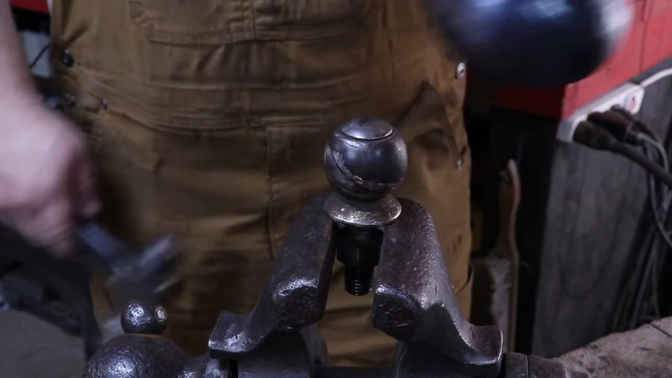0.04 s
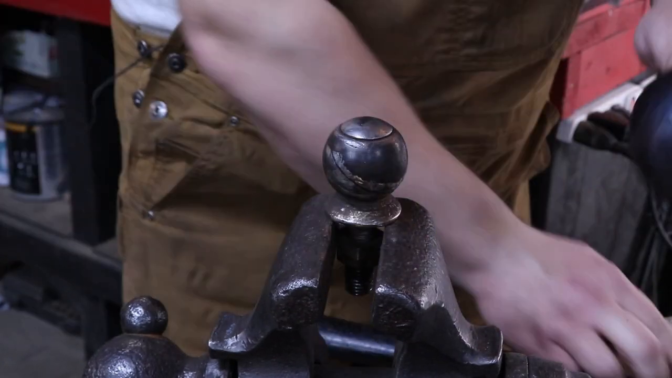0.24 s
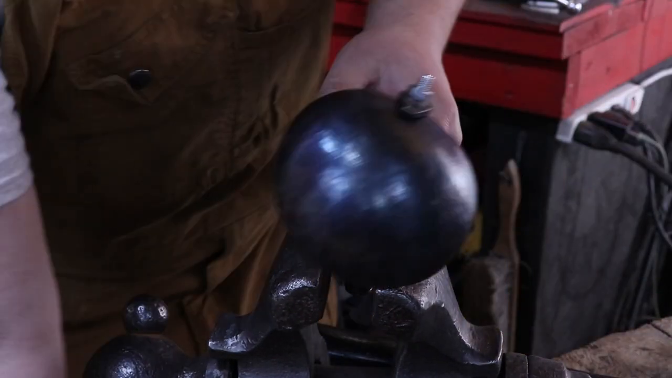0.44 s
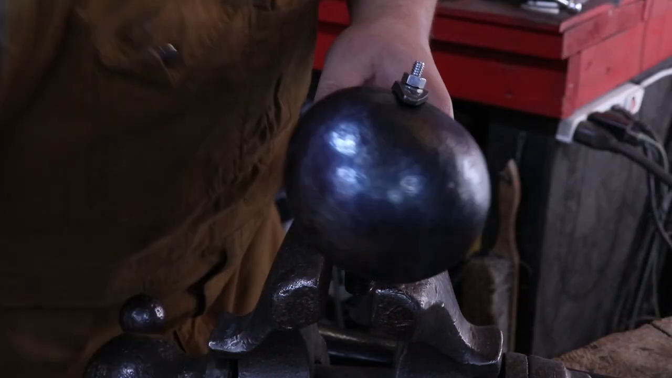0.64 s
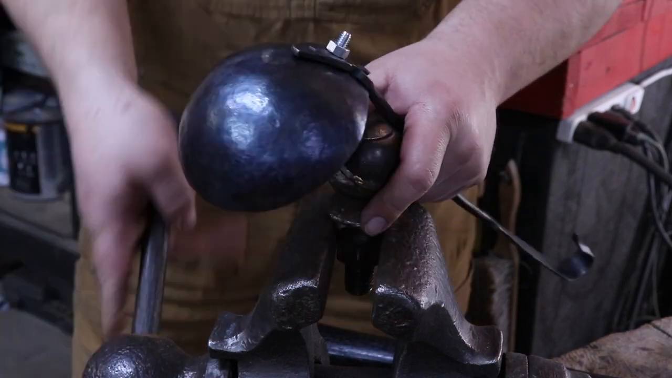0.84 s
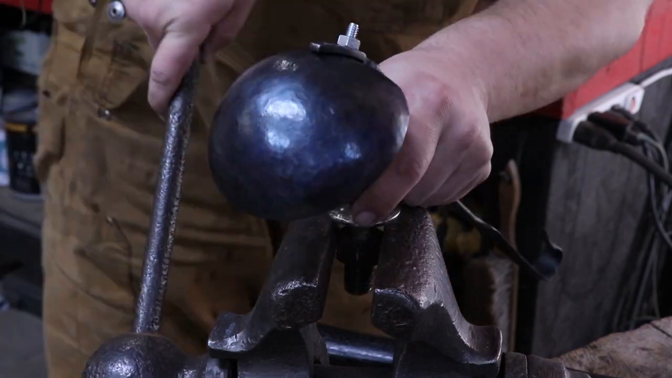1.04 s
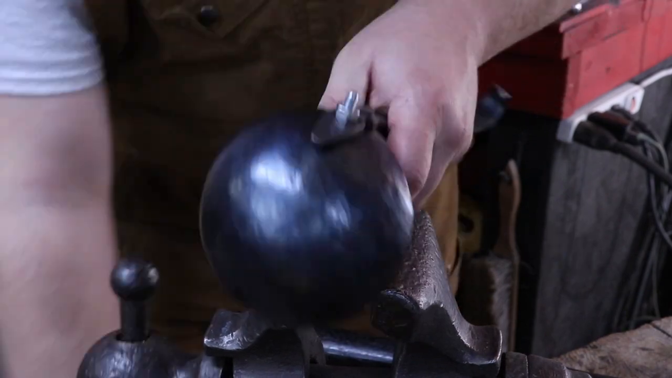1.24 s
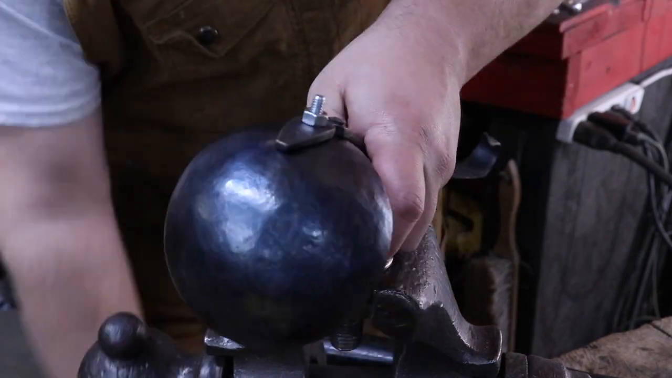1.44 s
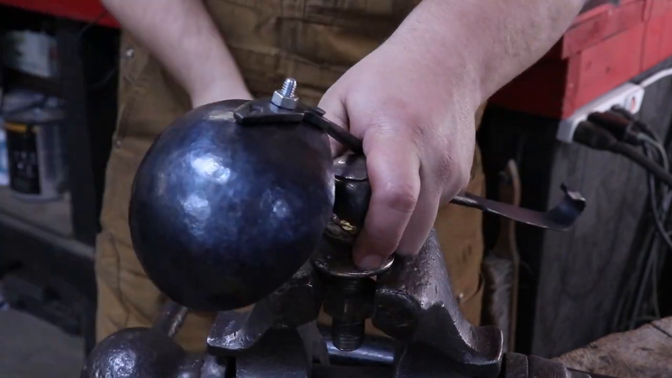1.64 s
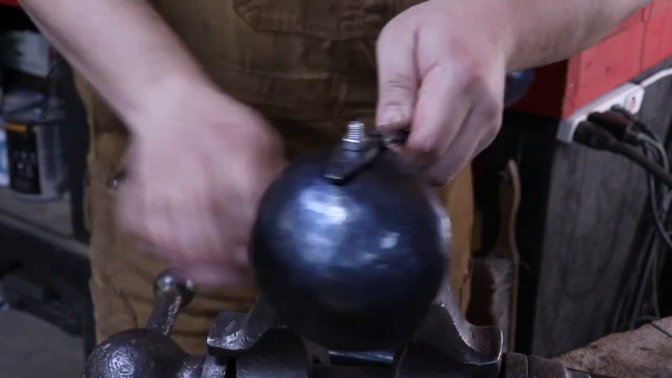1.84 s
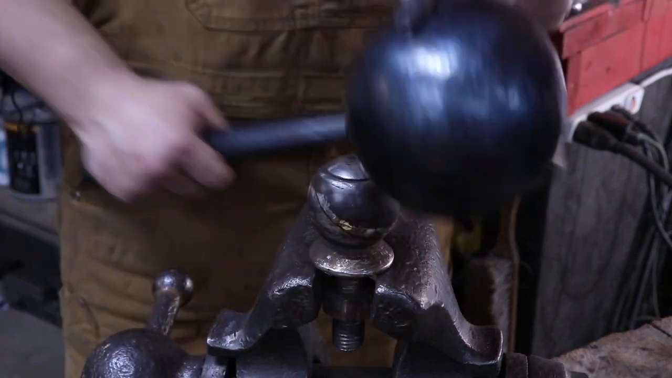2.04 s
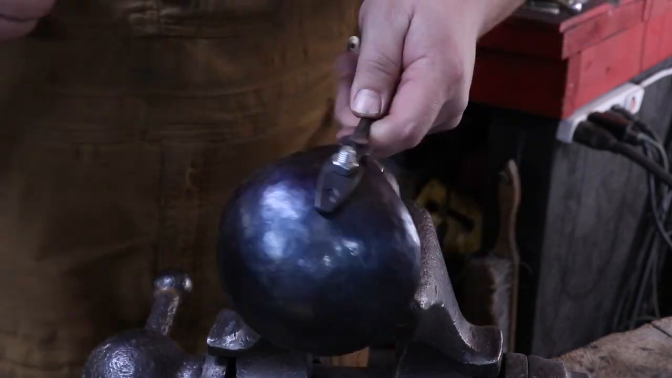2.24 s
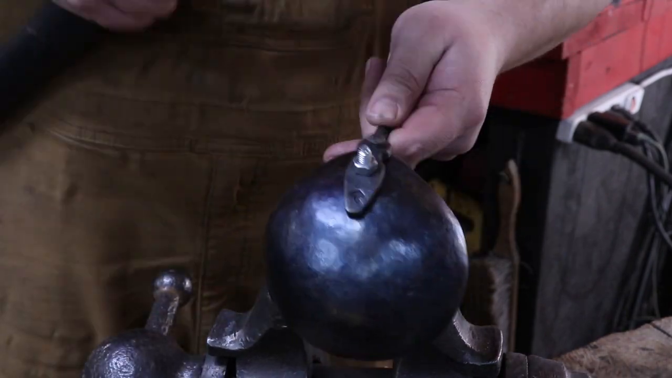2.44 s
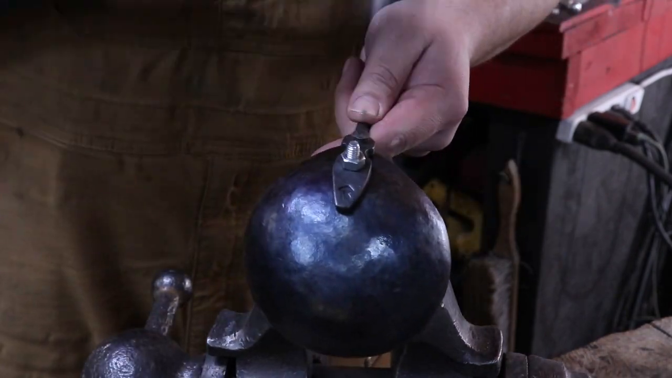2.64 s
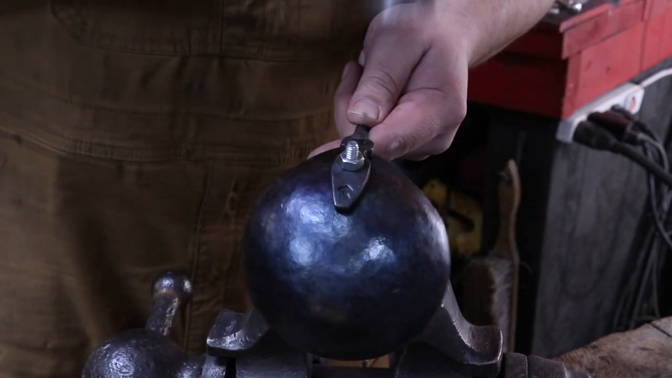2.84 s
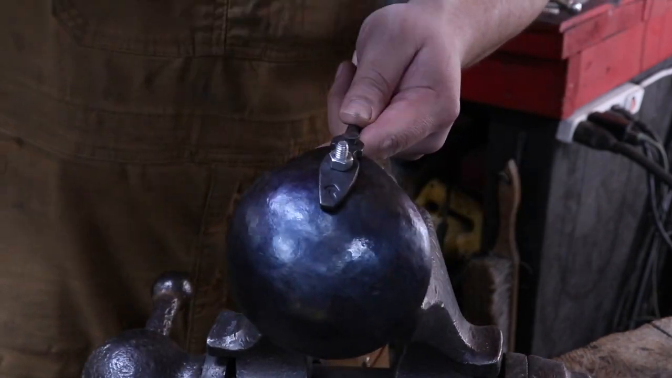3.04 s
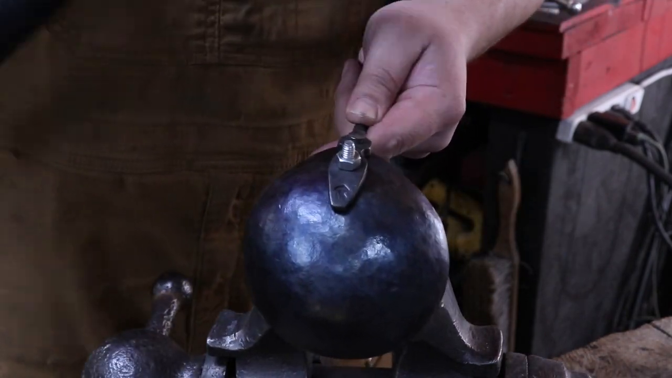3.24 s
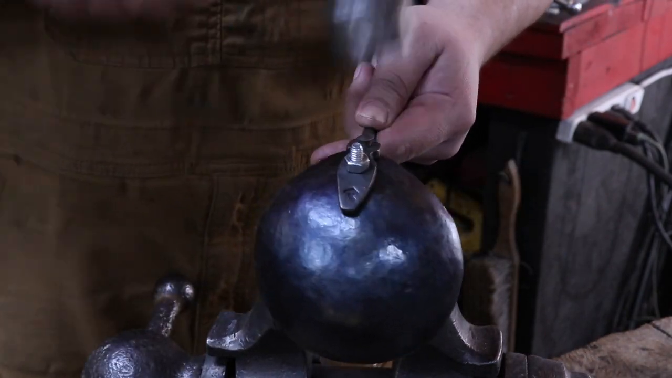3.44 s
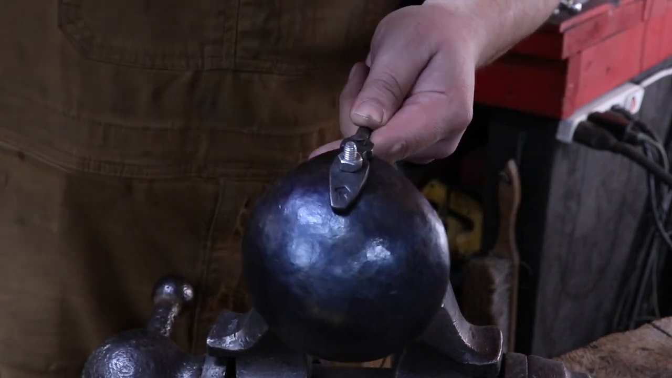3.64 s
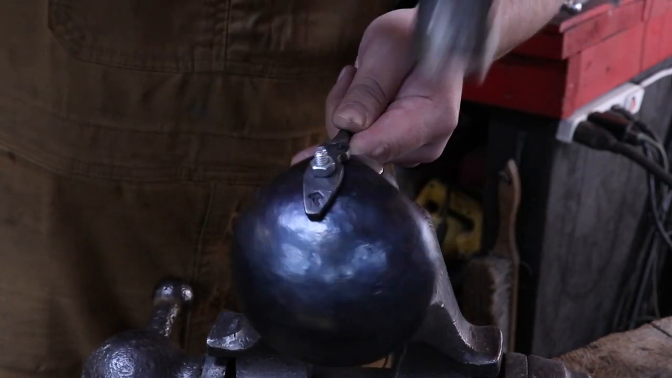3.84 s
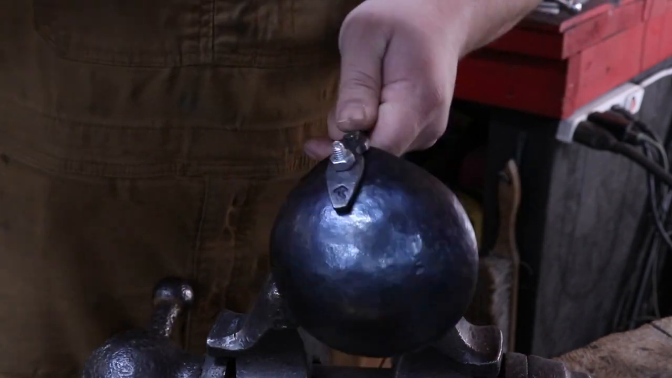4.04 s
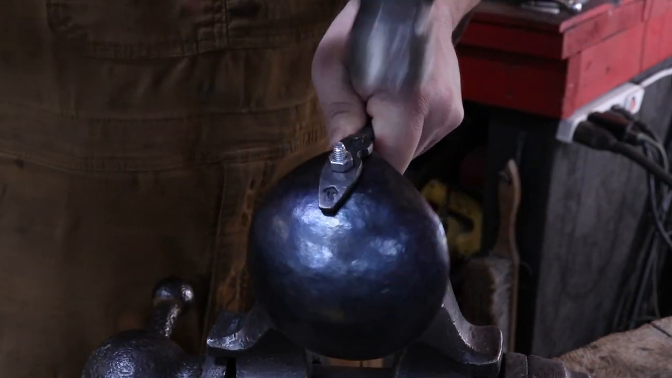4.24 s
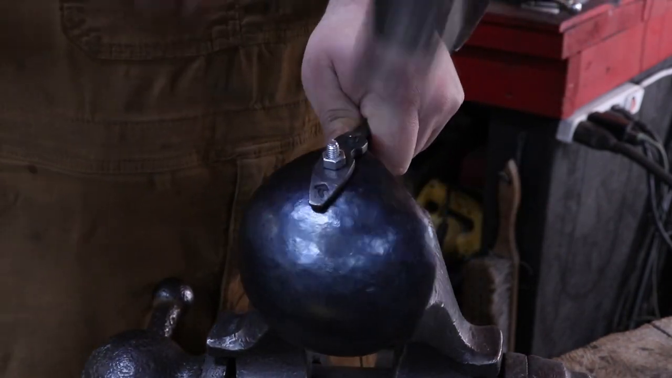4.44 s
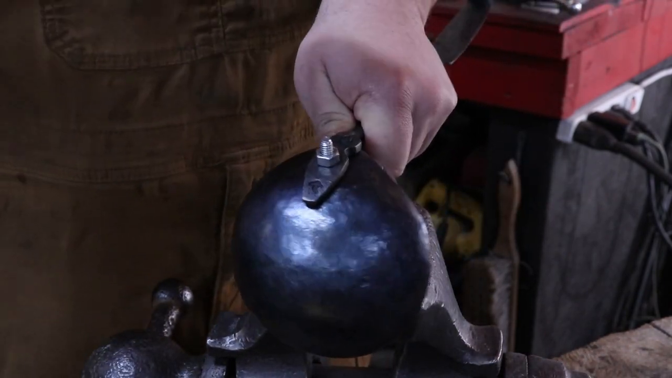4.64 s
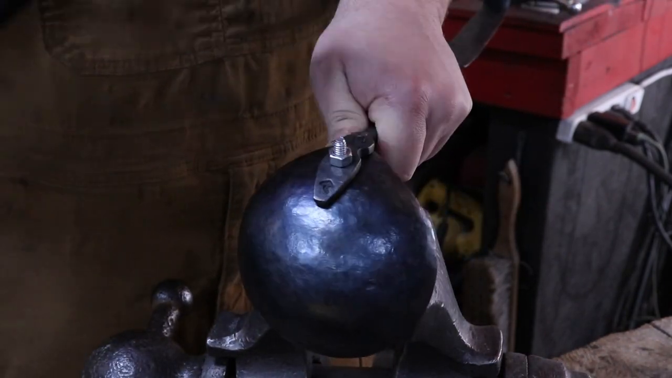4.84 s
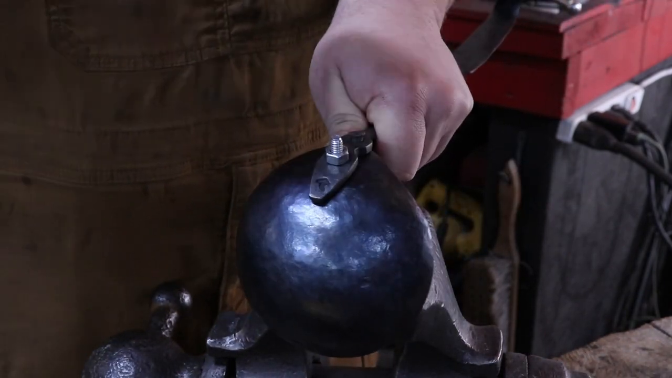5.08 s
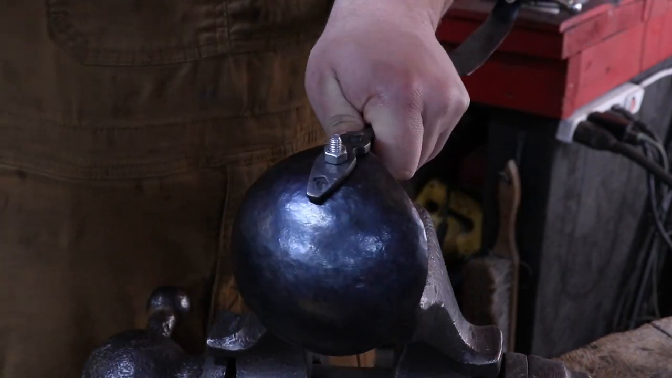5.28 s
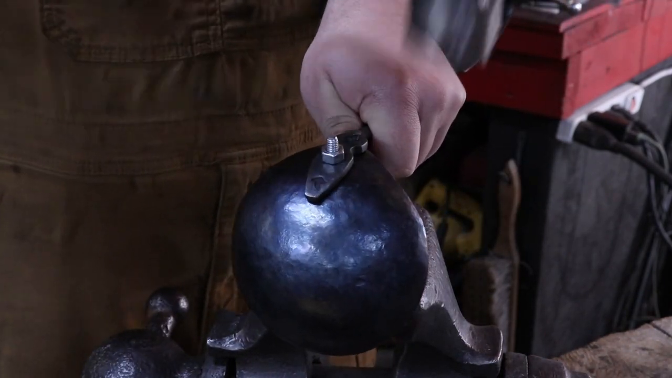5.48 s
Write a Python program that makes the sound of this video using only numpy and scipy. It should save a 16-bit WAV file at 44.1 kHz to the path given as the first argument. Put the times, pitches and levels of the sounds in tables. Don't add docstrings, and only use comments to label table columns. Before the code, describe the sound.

A small, quiet workshop heard through a close microphone, with faint steady room noise and a short reverberation. From 0 to 0.95 s a steel bowl is lifted and shifted on an iron stake: sharp bright clinks, strongest near 0.25, 0.43 and 0.74 s, mixed with short gritty iron scrapes. From 1.0 to 1.45 s the touches are softer and sparser; after a lull, more scrapes and clinks come at 1.75-2.25 s, with a duller handle knock near 2.17 s. At 2.28-2.54 s a hammer drags off the wooden bench, thudding and hissing. From 2.56 to 3.83 s it peens a rivet about twelve times a second, each blow a hard crack with a short, rattling, bright clang. A regrip brings faint scrapes and small ticks at 3.87-4.09 s. Blows resume from 4.14 s to about 5.46 s, slightly uneven, the hardest overloading and briefly muting the microphone.

```python
import sys
import numpy as np
from scipy import signal
from scipy.fft import rfft, irfft, next_fast_len
from scipy.io import wavfile
from scipy.ndimage import uniform_filter1d

SR = 44100
rng = np.random.default_rng(int(sys.argv[2]) if len(sys.argv) > 2 else 0)


def wav_out(sig):
    wavfile.write(sys.argv[1], SR, np.round(np.clip(np.atleast_2d(sig).T, -1, 1) * 32767).astype(np.int16))


def field_ratio(decibels):
    return 10 ** (np.asarray(decibels, dtype=float) / 20)


N = 242991
TIME = np.arange(N) / SR
SIZE = next_fast_len(N)
FREQ = np.maximum(np.arange(SIZE // 2 + 1) * SR / SIZE, 1)
DECAY = np.log(1000)

# time in seconds, ring level in dB, brightness in dB,
# ping of the hammer head in dB, overload of the microphone in dB.
HAMMER_BLOWS = [(2.5628, -43.5, -6, 2, -6), (2.6605, -36.5, 5.5, 2, -3.5), (2.7444, -34.5, 2.5, 0, -3),
                (2.8238, -32, 2, 3.5, -1), (2.8998, -34.5, 5, 0, 4.5), (2.977, -33.5, 2.5, 8, 8),
                (3.0613, -35.5, 2.4, -4.5, -0.5), (3.1749, -40, 1, -10, -1.5), (3.2695, -34, 4, -9, 4),
                (3.3431, -32.5, 1, 3.5, 10.5), (3.4283, -32.5, 1.5, 0, 6.5), (3.5125, -32, -0.5, 6, 4.5),
                (3.5941, -32, -0.4, 4.5, 5), (3.6739, -33, 1.5, 3.5, 13), (3.7497, -33, 1, 4, 6),
                (3.8266, -35, -0.5, -1, 2.5),
                (4.1402, -46, -3.5, 10.5, -1.5), (4.2307, -38.5, -1.5, 7, -1.5), (4.3073, -34.5, 0, 7.5, 4),
               (4.3814, -34.5, -0.5, 5.5, 0.0), (4.459, -36.5, -0.4, 10.5, -0.5),
               (4.5326, -35.5, -0.5, 10.5, 3), (4.6072, -35, 1, 0, 9), (4.6872, -37, 3, 5.5, -2),
               (4.802, -37.5, 1, 3, 3), (4.8782, -33.5, 0.6, -7, 4.5), (4.9522, -31.5, -0.2, -1.5, 8),
               (5.0264, -33, 1.5, -1.5, 7.5), (5.1, -33, 3, 0, 5.5), (5.172, -35, 3.5, 1, 8.5),
               (5.2439, -33, -1.7, 8.5, 2), (5.3163, -35, 2.2, 2.5, -1.5), (5.3866, -35, 0.5, -8, 1),
               (5.459, -33, -3, -1.5, 4)]
BLOWS = HAMMER_BLOWS
# pitch in Hz, time to fall by 60 dB in seconds.
RING_TIMES = [(200, 0.08), (530, 0.23), (1390, 0.1), (3680, 0.13), (9700, 0.13)]


def level(x, db):
    return x * field_ratio(db) / np.sqrt(np.mean(x ** 2))


def on_log_hz(table, hz):
    points_hz, values = np.transpose(table)
    return np.interp(np.log(hz), np.log(points_hz), values)


def colour(x, gain):
    return irfft(rfft(x, SIZE) * gain, SIZE)[:N]


def band(x, lo_hz, hi_hz):
    return signal.sosfilt(signal.butter(2, [lo_hz, hi_hz], "bandpass", fs=SR, output="sos"), x)


def fade(x, t60):
    return signal.lfilter([1], [1, -np.exp(-DECAY / (t60 * SR))], x)


def ring(x, hz, t60):
    return signal.lfilter([1], [1, -np.exp((2j * np.pi * hz - DECAY / t60) / SR)], x).imag


def grains(rate, spread_db):
    chance = rng.random((2, N))
    size_db = np.minimum(-spread_db * np.log(1 - chance[1]), 12)
    return (chance[0] < rate / SR) * field_ratio(size_db) * np.tanh(rng.standard_normal(N))


def quiet_shop():
    # frequency in Hz, strength in dB per Hz.
    shop_colour = [(18, -47), (30, -19), (181, -18.5), (291, -13), (547, -2), (1090, -16), (1450, -4),
                   (6050, -14.5), (14500, -28), (16500, -33)]
    return level(colour(rng.standard_normal(N), field_ratio(on_log_hz(shop_colour, FREQ))), -66)


def room_tail(near):
    t = np.arange(SR // 2) / SR
    walls = band(rng.standard_normal(len(t)), 900, 2420) * np.exp(-DECAY * t / .35) * (t > .006)
    walls = walls / np.sqrt(np.sum(walls ** 2))
    return field_ratio(-26) * signal.fftconvolve(near, walls)[:N]


def drag():
    # time in seconds, pressure in dB.
    press_points = [
        (2.265, -73),
        (2.291, -31),
        (2.409, -39),
        (2.465, -35),
        (2.487, -40),
        (2.543, -62),
        (2.562, -79),
    ]
    # frequency in Hz, strength in dB per Hz.
    bench_colour = [(35, -80), (60, -39), (167, -21), (242, -14.5), (277, -8.5), (358, -8.5), (403, -2),
                    (521, -5), (672, -6.5), (3500, -32.5), (4550, -62), (7700, -120)]
    # frequency in Hz, strength in dB per Hz.
    head_colour = [(1180, -31), (2000, -7), (3840, -11), (4270, -11), (5980, -6), (7520, -9), (8970, -5),
                   (9980, -7), (11200, -4.5), (13200, -16), (15400, -11), (16100, -21), (16500, -42)]
    s, db = np.transpose(press_points)
    pressure = field_ratio(np.interp(TIME, s, db, left=-300, right=-300))
    bumps = colour(grains(2500, 1.6), field_ratio(on_log_hz(bench_colour, FREQ)))
    hiss = colour(grains(7400, 0.86), field_ratio(on_log_hz(head_colour, FREQ)) * (FREQ > 2500))
    return pressure * level(bumps, 0) + pressure ** 0.5 * level(hiss, -31)


def wander():
    steps = TIME[::int(.03 * SR)]
    return field_ratio(3 * np.interp(TIME, steps, rng.standard_normal(len(steps))))


def scrape():
    # start in seconds,
    # length in seconds, level in dB, weight on the stake in dB, free ringing in dB.
    strokes = [(.0, 0.061, -55.5, -4, -1), (0.132, 0.062, -66.5, 3.5, -12), (0.27, 0.0078, -34, -6.5, -27),
               (0.363, 0.031, -59, 3, 3), (0.441, 0.0033, -41, -1, 7), (.485, 0.054, -80, -6, -3),
               (0.64, 0.031, -54, 2.5, 6), (0.699, 0.043, -38.5, -2.5, 5.5), (0.759, 0.029, -41, -5, 7),
               (0.853, 0.05, -36.5, -5.5, 5),
               (1.02, 0.045, -59.5, -2, -6), (1.131, 0.093, -50, -5.5, -4.5), (1.266, 0.0082, -39, -6.5, -4),
             (1.385, 0.0072, -42, -3.5, -24), (1.474, 0.15, -70, -1, -19), (1.615, 0.048, -58.5, -3, 0),
             (1.789, 0.045, -33, -9.5, 2.5), (1.877, 0.038, -47.5, -5.5, 2), (1.7, .04, -70, -18, -15),
             (1.967, 0.035, -70, 7, -15), (2.024, 0.048, -60.5, -1, 2.5), (2.093, 0.019, -45.5, -12, -2.5),
             (2.16, 0.016, -43, -4.5, -3), (2.231, 0.004, -37, -19, -7), (3.868, 0.066, -65.5, -29, 8),
             (3.957, 0.059, -61.5, -8, -7)]
    # pitch in Hz, width in Hz, level in dB.
    iron_modes = [(630, 39, -3), (1520, 200, -3), (2330, 87, -3), (3430, 87, -2), (3690, 29, -5),
                  (5650, 150, -5), (6100, 39, -5), (6830, 130, -1), (7650, 170, -7), (8380, 100, -7),
                  (8750, 39, -9), (11200, 120, -3), (11500, 37, -5), (13100, 74, -9)]
    rise, fall, body_fall = 1011, 518, 308
    slips = level(grains(4000, 3.7), 0)
    catches = level(grains(2500, 3.4), 0)
    iron = np.zeros(N)
    for hz, width, db in iron_modes:
        resonance = 1 / (1 + ((FREQ - hz) / (0.69 * width)) ** 2)
        iron += field_ratio(db) * wander() * colour(catches, resonance)
    hiss_gain, body_gain, iron_gain = np.zeros((3, N))
    for s, length, db, weight_db, free_db in strokes:
        i = slice(max(int((s - .15) * SR), 0), int((s + length + .2) * SR))
        early = np.maximum(s - TIME[i], 0)
        late = np.maximum(TIME[i] - s - length, 0)
        hiss_gain[i] += field_ratio(db - rise * early - fall * late)
        body_gain[i] += field_ratio(db + weight_db - rise * early - body_fall * late)
        iron_gain[i] += field_ratio(db + free_db - rise * early - fall * late)
    hiss = hiss_gain * level(band(slips, 3350, 15600), -5)
    body = body_gain * level(band(slips, 680, 1850), -5)
    return hiss + body + iron_gain * level(iron, -6)


def touch(peak_db, low_hz, body_db, t60, treble_db, spread):
    t = np.arange(SR // 4) / SR
    noise = rng.standard_normal((4, len(t)))
    high_hz = 11030 * (1 + 0.11 * np.tanh(rng.standard_normal()))
    bright = level(band(noise[0], 2500, 16000), treble_db - 6)
    low = level(band(noise[1], low_hz * (1 - spread), low_hz * (1 + spread)), -5.1)
    high = level(band(noise[2], high_hz * (1 - spread), high_hz * (1 + spread)), treble_db - 9.5)
    body = level(band(noise[3], 690, 2760), body_db + 8.0)
    tick = field_ratio(4) * np.exp(-t / .002)
    envelope = np.exp(-DECAY * t / t60) + tick
    return field_ratio(peak_db - 12) * envelope * (bright + low + high + body)


def clinks():
    # time in seconds, peak in dB, ring
    # in Hz, duller body in dB.
    contacts = [(.1152, -46, 2880, -11), (.2106, -28, 6200, -13), (.2523, -14, 7300, -20.5),
                (.3028, -39.5, 5730, -11), (.4285, -17.5, 6750, -30), (.4841, -27.5, 6700, -35),
                (.5008, -32.5, 7000, -21), (.5254, -29, 6200, -32), (.568, -33.5, 6900, -38),
                (.6186, -24.5, 6700, -26.5), (.6586, -26.5, 7600, -22), (.6828, -30, 6100, -26),
                (.6995, -22.5, 7840, -13), (.744, -13, 2420, -19), (.7708, -27, 6600, -14),
                (.846, -26.5, 3080, -13), (.86, -32.5, 6860, -13), (.8752, -23, 3300, -25),
                (.8987, -21, 4930, -20),
                (1.1267, -45, 2520, -2.5), (1.2486, -35.5, 6700, -8.5), (1.2744, -30, 6960, -11.5),
               (1.3157, -35, 3530, -9), (1.3441, -29, 6830, -21), (1.3762, -42, 3080, -16),
               (1.3885, -32, 3670, -15.5), (1.4097, -33, 3330, -16), (1.7778, -26.5, 6760, -20),
               (1.8387, -24.5, 3130, -13), (1.878, -28.5, 5070, -25), (1.8917, -34, 8000, -18),
               (1.9099, -32.5, 5500, -26), (2.0708, -16.5, 7600, -29), (2.082, -22, 6170, -44),
               (2.1228, -23, 7860, -43), (2.131, -29, 7160, -22), (2.1374, -30, 8050, -28),
               (2.144, -26.5, 7440, -18), (2.264, -33, 7300, -17)]
    # time in seconds, peak in dB.
    regrip = [
        (3.1547, -41),
        (3.917, -36),
        (3.96, -38),
        (3.995, -42),
        (4.0147, -35.5),
        (4.0275, -32.5),
        (4.0495, -36),
        (4.0864, -50),
    ]
    # time in seconds, peak in dB, ring in Hz, body in dB.
    knocks = [
        (0.524, -45, 1140, -13),
        (0.565, -37, 1090, -22),
        (2.168, -23.5, 1188, -16),
        (2.534, -37.5, 490, -11),
    ]
    out = np.zeros(N + SR // 4)

    def add(s, sound):
        start = int(s * SR)
        out[start:start + len(sound)] += sound

    for s, peak_db, hz, body_db in contacts:
        add(s, touch(peak_db, hz, body_db, t60=.065, treble_db=0, spread=.04))
    for s, peak_db in regrip:
        add(s, touch(peak_db, 7520, -14.5, t60=.065, treble_db=0, spread=.04))
    for s, peak_db, hz, body_db in knocks:
        add(s, touch(peak_db, hz, body_db, t60=.13, treble_db=-25, spread=.025))
    return out[:N]


def blows(hz, extra_db=0):
    s, db, bright_db, ping_db, _ = np.transpose(BLOWS)
    ping = ping_db * np.exp(-(np.log2(hz / 7300) / 0.13) ** 2)
    bright = bright_db * np.clip(np.log2(hz / 1500) / 2.6, 0, 1)
    train = np.zeros(N)
    train[(s * SR).astype(int)] = field_ratio(db + extra_db + ping + bright)
    return train


def struck_metal():
    # pitch in Hz, width in Hz, level in dB.
    metal_modes = [(404, 9.2, -22.5), (615, 10, -14.5), (862, 15, -13), (1005, 40, -17), (1045, 20, -8),
                   (1311, 10, -18.5), (1375, 46, -2.5), (1537, 10, -10.5), (1590, 90, -8.5),
                   (1908, 38, -9.5), (2169, 27, -18), (2346, 17, -19), (3300, 120, -10.5), (3715, 27, -12),
                   (4280, 110, -15), (5465, 55, -7), (5566, 25, -8), (5720, 26, -10), (6990, 14, -14.5),
                   (7130, 32, -9), (7260, 26, -10), (7340, 75, -5), (7260, 30, -20.5), (7840, 27, -15),
                   (8930, 40, -18.5), (10290, 190, -11.5), (11200, 60, -15.5), (13100, 50, -41)]
    metal = metal_modes
    chatter = rng.standard_normal(N)
    spot_db = 2.0 * rng.standard_normal((len(metal), len(BLOWS)))
    out = np.zeros(N)
    for (hz, width, mode_db), spot in zip(metal, spot_db):
        train = blows(hz, spot)
        crack = field_ratio(7.0) * fade(train, 0.003)
        echo_push = fade(train, .75 * on_log_hz(RING_TIMES, hz))
        t60 = DECAY / (np.pi * max(width, 36))
        out += field_ratio(mode_db) * width / 50 * ring((crack + echo_push) * chatter, hz, t60)
    return out


def clang():
    # frequency in Hz, strength in dB per Hz.
    clang_colour = [(35, -72), (60, -110), (521, -13.5), (1060, 2.5), (1190, -8.5), (1370, -1.5),
                    (3260, -4.5), (4750, -9), (7250, -4), (8540, -11), (10600, -9.5), (15000, -11),
                    (16500, -18)]
    out = np.zeros(N)
    for hz in 70 * 2 ** np.arange(0, 8.1, .5):
        share = np.clip(1 - np.abs(2 * np.log2(FREQ / hz)), 0, 1) ** .5
        noise = colour(rng.standard_normal(N), share * field_ratio(on_log_hz(clang_colour, FREQ)))
        train = blows(hz)
        envelope = fade(train, on_log_hz(RING_TIMES, hz)) + field_ratio(-0.5) * fade(train, 0.052)
        out += noise * uniform_filter1d(envelope, size=24, origin=11)
    return out


def hammer():
    return band(field_ratio(-15.5) * struck_metal() + field_ratio(16.5) * clang(), 504, 16800)


def scene():
    near = drag() + scrape() + clinks() + hammer()
    return (near + room_tail(near) + quiet_shop())[None]


def input_gate():
    dropouts = [2.904, 3.274, 3.7548, 4.8056, 5.3896]
    mutes = [(s + .0008, .3 * db) for s, *_, db in BLOWS if db > 1.2]
    gate = np.ones(N)
    for s, ms in mutes + [(s, 14) for s in dropouts]:
        since_ms = (TIME - s) * 1000
        opening = (since_ms - .84 * ms) / (.25 * ms)
        floor = field_ratio(-75) + np.exp(-np.abs(since_ms) / .3)
        gate *= np.where(since_ms > 0, np.clip(opening, floor, 1), 1)
    return gate


def top_cut(x):
    return signal.sosfilt(signal.butter(12, 17020, fs=SR, output="sos"), x)


def record(dry):
    duck_db, attack = np.zeros(N), np.zeros(N)
    for s, *_, overload_db in BLOWS:
        i = slice(int(s * SR), int((s + .06) * SR))
        after = TIME[:i.stop - i.start] + TIME[i.start] - s
        after = after[:len(duck_db[i])]
        duck_db[i] = -1.8 * overload_db * np.exp(-after / 0.0052)
        attack[i] = np.exp(-after / 0.0084)
    gate = input_gate()
    heard = dry * field_ratio(duck_db) * uniform_filter1d(gate, size=11)
    heard = signal.sosfilt(signal.butter(2, 160, "highpass", fs=SR, output="sos"), heard)
    preamp_rumble = level(band(rng.standard_normal(N), 20, 230), -101)
    heard = heard + gate * preamp_rumble
    main = signal.sosfilt(signal.ellip(10, .2, 40, 15750, fs=SR, output="sos"), heard)
    top = signal.sosfilt(signal.cheby1(4, 1, [15850, 16600], "bandpass", fs=SR, output="sos"), heard)
    return top_cut(main + field_ratio(-6) * attack * top)


dry = scene()
out = record(dry)
wav_out(out)
```